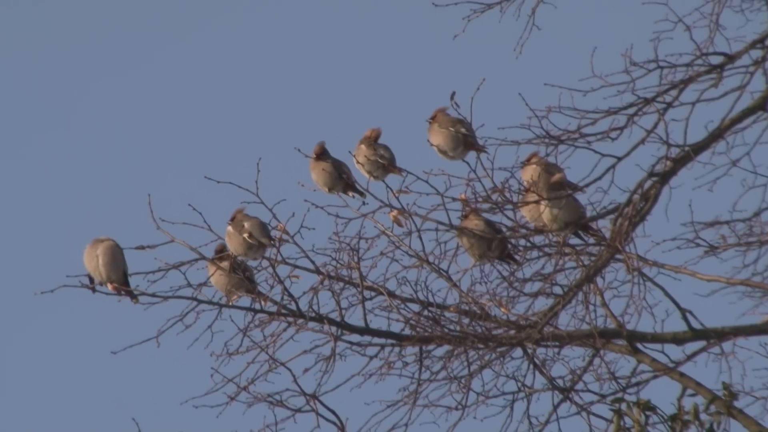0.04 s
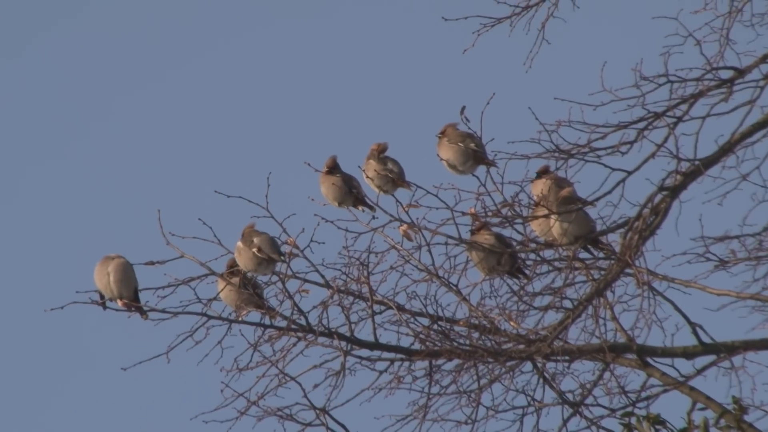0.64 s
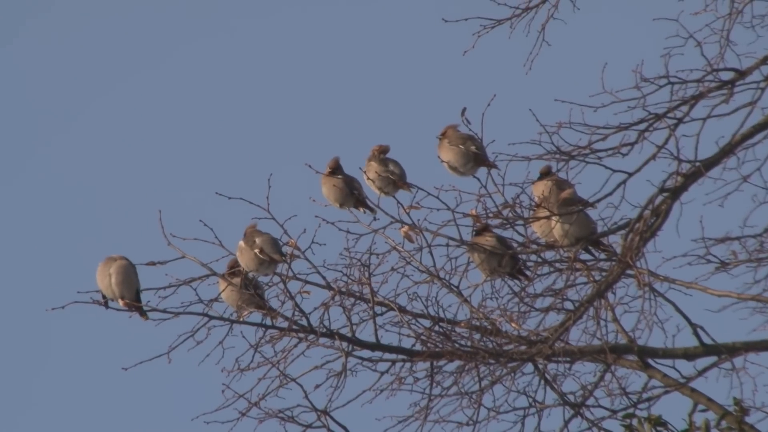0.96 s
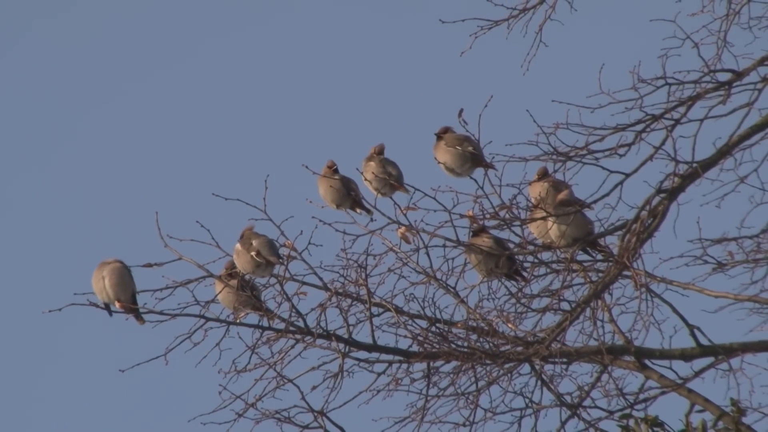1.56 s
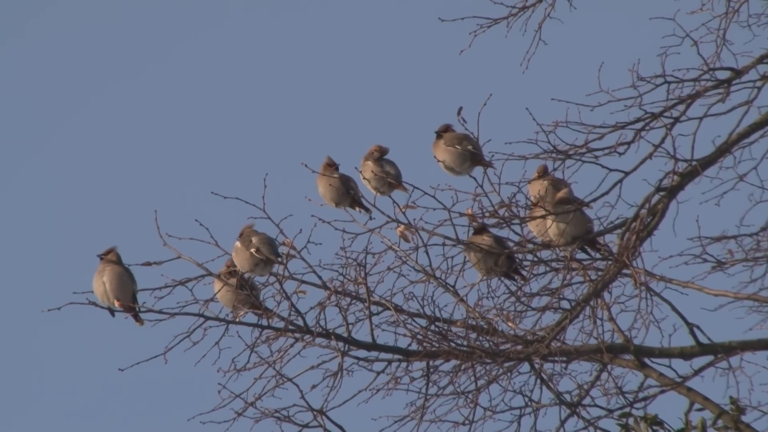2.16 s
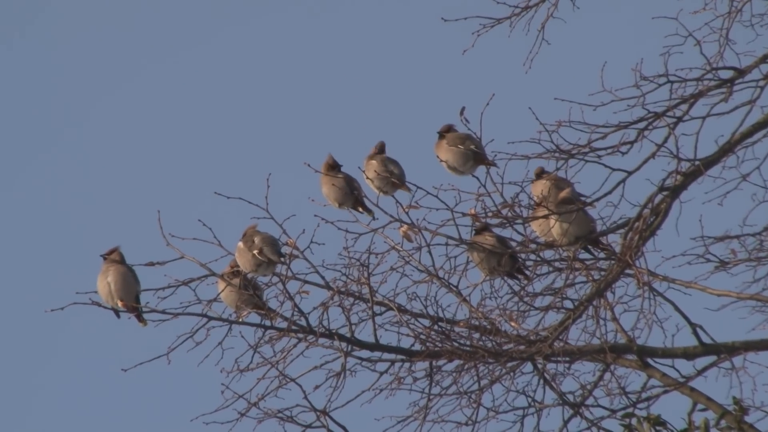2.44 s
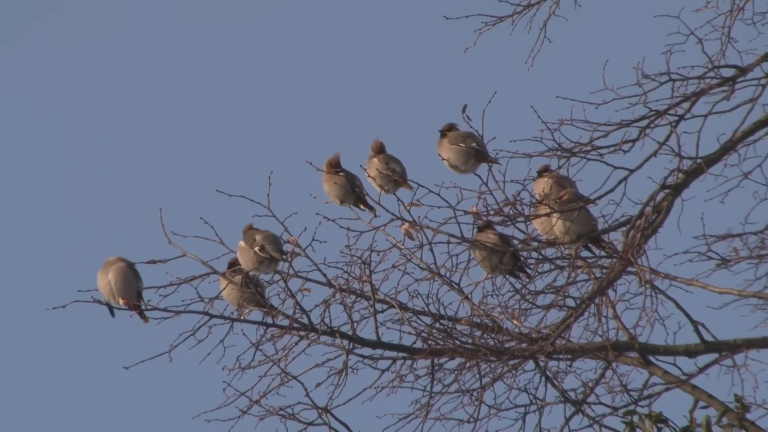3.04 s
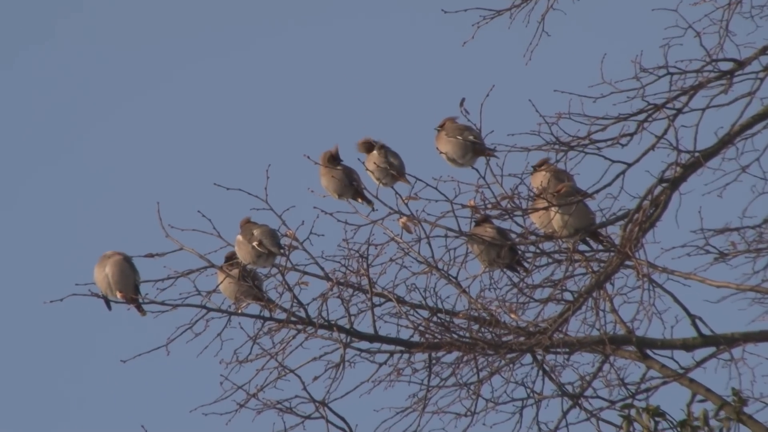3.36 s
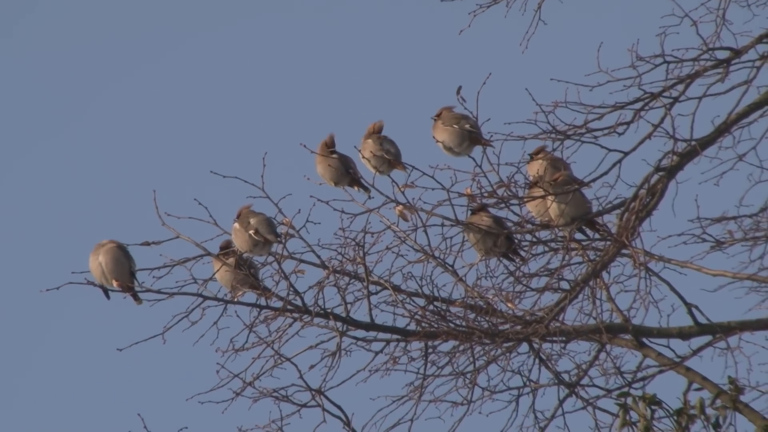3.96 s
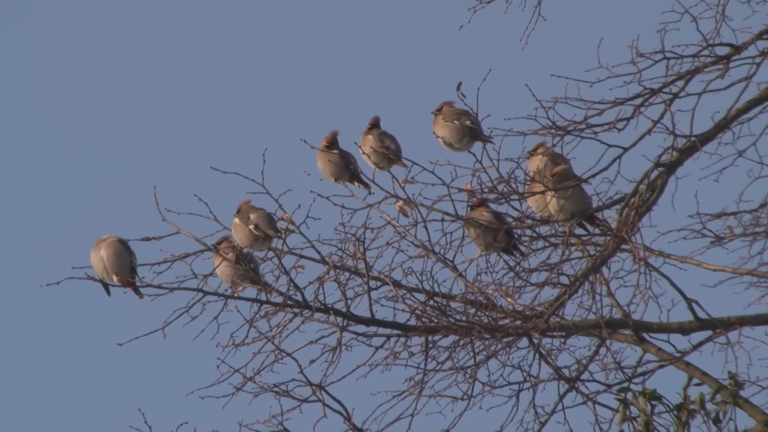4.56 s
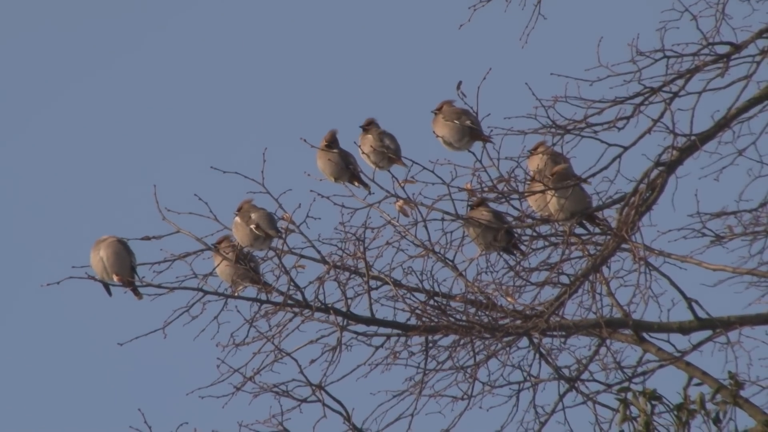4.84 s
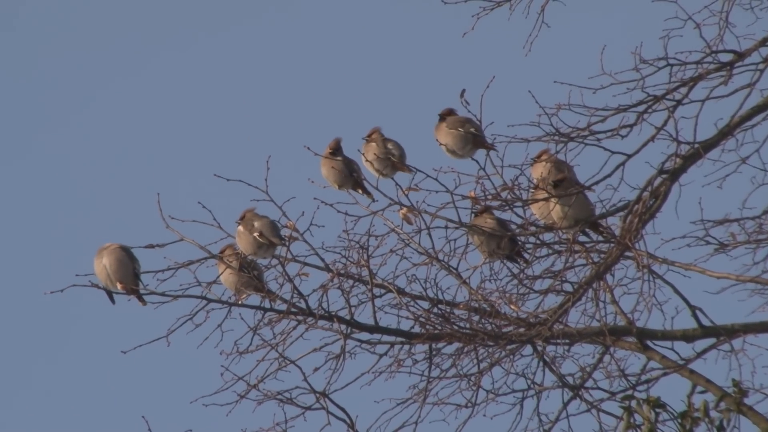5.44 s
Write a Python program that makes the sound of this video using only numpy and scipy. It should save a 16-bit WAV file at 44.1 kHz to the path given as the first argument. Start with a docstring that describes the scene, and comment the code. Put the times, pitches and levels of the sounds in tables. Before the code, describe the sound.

A light wind rumbles unevenly on the microphone outdoors, over a soft hiss and the hum of distant traffic. About a second in, small birds give two faint, thin, high trills, while others rasp and whistle farther off. Two more short trills follow past the middle. Near the end the wind buffets harder, the hand-held camera gives one small click, and a few faint chirps follow.

```python
"""A flock of waxwings gives thin, high trills from a bare tree: trains of frequency-modulated, almost pure
tones that interfere with their reflections from the branches. Other birds whistle and rasp farther off.
Turbulence in a light wind rumbles on the microphone over a steady hiss and the hum of distant traffic.
The hand-held camera whines faintly, rustles and creaks under the fingers, and one click rings its shell."""
import sys
import numpy as np
from scipy import signal
from scipy.fft import rfft, irfft, next_fast_len
from scipy.io import wavfile
from scipy.ndimage import uniform_filter1d

SR = 44100
rng = np.random.default_rng(int(sys.argv[2]) if len(sys.argv) > 2 else 0)


def to_wav(sig):
    """Store sig (one row per channel, or 1-D mono) as 16-bit WAV at the path in sys.argv[1].

    Samples outside -1..1 are clipped; the rate is SR.
    """
    pcm = np.clip(np.atleast_2d(sig), -1, 1) * 32767
    pcm = np.round(pcm).astype(np.int16)
    wavfile.write(sys.argv[1], SR, pcm.T)  # frames by channels


N = 242991
TIME = np.arange(N) / SR


def from_db(db):
    """Amplitude ratio of a level in decibels."""
    return 10 ** (np.asarray(db) / 20)


def rms_one(x):
    """Normalisation to unit rms."""
    return x / np.sqrt(np.mean(x ** 2) + 1e-20)


def noise(spectrum):
    """Spectral shaping: noise of unit rms, falling 20 dB per octave beyond the given points."""
    hz, db = np.transpose(spectrum)
    size = next_fast_len(N)
    octave = np.log2(np.maximum(np.arange(size // 2 + 1) * SR / size, 1))
    points = np.log2(hz)
    beyond = np.abs(octave - np.clip(octave, points[0], points[-1]))
    gain = from_db(np.interp(octave, points, db) - 20 * beyond)
    return rms_one(irfft(rfft(rng.standard_normal(size)) * gain, size)[:N])


def drift(hz):
    """Random modulation: low-pass noise of unit rms with its corner at hz."""
    r = np.exp(-2 * np.pi * hz / SR)
    return rms_one(signal.lfilter([1], [1, -2 * r, r * r], rng.standard_normal(N + SR))[SR:])


def resonate(x, hz, width_hz):
    """A damped resonance with unit peak gain."""
    r = np.exp(-np.pi * width_hz / SR)
    feedback = [1, -2 * r * np.cos(2 * np.pi * hz / SR), r * r]
    return signal.lfilter(np.array([1, 0, -1]) * (1 - r * r) / 2, feedback, x + 1e-18)


def span(start, length):
    """The samples of an event and its progress from 0 to 1."""
    at = np.flatnonzero((TIME >= start) & (TIME < start + length))
    return at, (TIME[at] - start) / length


def fade(progress, share):
    """Quarter-sine tapers, each a share of the event long."""
    return np.sin(np.pi / 2 * np.clip(np.minimum(progress, 1 - progress) / share, 0, 1))


def bell(peak, width):
    """Gaussian envelope, down to 1/e one width from its peak."""
    return np.exp(-((TIME - peak) / width) ** 2)


def phase_of(hz):
    """Phase as the time integral of frequency."""
    return 2 * np.pi * np.cumsum(hz) / SR


def scatter(x, t60, count=60):
    """Scattering by branches and walls: decaying echoes, together as strong as the sound itself."""
    delays = rng.uniform(0.006, t60, count)
    response = np.zeros(int(t60 * SR) + 1)
    response[(delays * SR).astype(int)] = from_db(-60 * delays / t60) * rng.choice([-1, 1], count)
    return signal.fftconvolve(x, response / np.linalg.norm(response))[:N]


# Noise floor spectrum: f/Hz, relative density/dB
HISS_SPECTRUM = [(1000, 0), (1800, -.6), (2500, -1.8), (3900, -2.4), (5500, -4), (7700, -5.4),
                 (10500, -5.6), (15500, -6.3)]

def hiss(level_db=-78.3):
    """Stationary broadband noise of the air and the microphone."""
    return from_db(level_db) * noise(HISS_SPECTRUM)


# Tyre noise spectrum: f/Hz, relative density/dB
TRAFFIC_SPECTRUM = [(120, -9.5), (220, 2.2), (300, -2), (410, 2), (560, -4.3), (700, -8.7), (950, -15),
                    (1200, -27.5), (1500, -34), (1700, -34.5), (2000, -42)]
# Passing vehicles: peak t/s, width/s, gain/dB
VEHICLES = [(2.1, 0.28, 1), (3.0, 0.29, 1.8), (4.55, .35, 1.5)]

def traffic(level_db=-58, swing_db=0.08):
    """Attenuation over distance dulls the tyre noise of far roads; it swells as vehicles pass."""
    swell_db = sum(db * bell(peak, width) for peak, width, db in VEHICLES)
    return from_db(level_db + swell_db + swing_db * drift(0.65)) * noise(TRAFFIC_SPECTRUM)


# Gusts, the narrow ones single buffets: peak t/s, width/s, level/dB
WIND_GUSTS = [(0.04, 0.029, -37), (0.501, 0.29, -34), (1.04, 0.33, -38.5), (2.313, 0.37, -39.5),
              (2.98, 0.27, -40), (4.25, 0.4, -35.5), (2.362, 0.0082, -29.5), (4.332, 0.01, -26.5),
              (4.503, 0.015, -29.5), (4.706, 0.0065, -22), (4.7, 0.29, -37), (4.943, 0.0049, -30.5),
              (4.993, 0.078, -32), (5.35, 0.8, -41)]
# Rumble spectrum: f/Hz, relative density/dB
RUMBLE_SPECTRUM = [(12, -50), (20, -16.5), (49, 0.5), (75, 0.5), (112, -7.5), (211, -24.5), (330, -32.5),
                   (430, -46.5), (730, -120)]

def wind(breeze_db=-45.5, turbulence_db=1.27, evenness=0.64, small_eddy_db=-22):
    """Turbulent pressure on the microphone port: large eddies rumble, smaller ones sound higher."""
    gust_power = sum(from_db(db) ** 2 * bell(peak, width) for peak, width, db in WIND_GUSTS)
    strength = np.sqrt(from_db(breeze_db) ** 2 + gust_power) * from_db(turbulence_db * drift(8.1))
    eddies = noise(RUMBLE_SPECTRUM)
    envelope = np.sqrt(uniform_filter1d(eddies ** 2, size=6000) + 1e-9)
    rumble = rms_one(eddies / envelope ** evenness)  # partly evens out the chance swells
    small_eddies = noise([(110, 6.5), (220, -15.5), (450, -18.5), (800, -26), (1200, -42)])
    return strength * (rumble + from_db(small_eddy_db) * small_eddies)


# Bursts of small eddies: peak t/s, width/s, level/dB
EDDY_BURSTS = [(.715, 0.088, -36.5), (1.86, 0.14, -48.5), (2.221, 0.039, -41.5), (4.881, 0.018, -36)]
# Their spectrum: f/Hz, relative density/dB
EDDY_SPECTRUM = [(115, 2), (150, -2), (210, -17.5), (300, -28.5)]

def flurries():
    """Intermittent turbulence: brief flurries of small eddies flutter above the rumble."""
    strength = sum(from_db(db) * bell(peak, width) for peak, width, db in EDDY_BURSTS)
    return strength * noise(EDDY_SPECTRUM)


def camera_whine(hz=14570, wander_hz=8, level_db=-94.5):
    """A pure tone from the electronics, with slight random frequency modulation."""
    return np.sqrt(2) * from_db(level_db) * np.sin(phase_of(hz + wander_hz * drift(3.0)))


# Fingers shifting on the camera: t/s, duration/s, level/dB
FINGER_SLIDES = [(1.354, 0.045, -72.5), (1.616, 0.021, -79), (3.295, 0.039, -80), (3.722, 0.03, -79.5),
                 (4.535, 0.061, -75), (4.937, 0.093, -77), (5.078, 0.015, -79), (5.194, 0.022, -79)]
# Friction spectrum: f/Hz, relative density/dB
FRICTION_SPECTRUM = [(3000, 0), (7000, 4.5), (11000, 6), (15500, 1)]

def finger_rustle(grain_db=2.5):
    """Sliding friction makes bright noise with a grainy envelope."""
    rubbing = np.zeros(N)
    for start, length, db in FINGER_SLIDES:
        at, progress = span(start, length)
        rubbing[at] += from_db(db) * fade(progress, 0.043)
    return rubbing * from_db(grain_db * drift(200)) * noise(FRICTION_SPECTRUM)


# Creaks of the grip: t/s, level/dB
CREAKS = [(2.659, -64), (4.053, -74), (4.867, -76), (4.941, -75)]

def grip_creaks(t60=.035):
    """Heavily damped transients: puffs of mid-range noise that decay exponentially."""
    strength = np.zeros(N)
    for start, db in CREAKS:
        at, _ = span(start, .1)
        strength[at] += from_db(db - 60 * (TIME[at] - start) / t60)
    return strength * noise([(1300, -3), (1750, 3), (3000, -2), (5000, 0), (7000, -4), (14000, -10)])


# A click and its rebounds: t/s, force level/dB
CONTACTS = [(4.892, -21), (4.8932, -45), (4.8946, -36)]
# Modes of the plastic shell: f/Hz, bandwidth/Hz, gain/dB
SHELL_MODES = [(880, 240, 5.5), (1800, 390, 2), (2420, 440, -1.5), (4550, 610, -6), (5700, 1100, -6.5),
               (8000, 1000, -1), (9900, 750, -2), (11300, 570, 5.5), (13800, 6900, -8)]

def camera_click(buzz_db=-26, buzz_t60=0.04, echo_db=-24):
    """Impact excitation: each contact, an impulse and a fainter buzz, rings the modes of the shell."""
    force = np.zeros(N)
    for start, db in CONTACTS:
        at, _ = span(start, .1)
        force[at[0]] += from_db(db)
        decay_db = 60 * (TIME[at] - start) / buzz_t60
        force[at] += from_db(db + buzz_db - decay_db) * rng.choice([-1, 1], len(at))
    click = sum((-1) ** k * from_db(db) * resonate(force, hz, width)
                for k, (hz, width, db) in enumerate(SHELL_MODES))
    return click + from_db(echo_db) * scatter(click, t60=0.18, count=400)


# Raspy chirps: t/s, duration/s, first f/Hz, last f/Hz, relative level/dB
RASPS = [(.706, .057, 5380, 5200, -78), (0.763, 0.06, 4530, 3890, -73), (.82, .052, 3770, 2850, -78.5)]

def raspy_chirps(gain_db=-2, flutter_db=3.0, echo_db=-5):
    """Fast random modulation of frequency and amplitude spreads a bird's tone into a band."""
    calls = np.zeros(N)
    wobble = 1 + .065 * drift(450)
    for start, length, first_hz, last_hz, db in RASPS:
        at, progress = span(start, length)
        hz = (first_hz + (last_hz - first_hz) * progress) * wobble[at]
        calls[at] += fade(progress, 0.35) * from_db(db + gain_db) * np.sin(phase_of(hz))
    calls *= from_db(flutter_db * drift(220))
    return calls + from_db(echo_db) * scatter(calls, t60=0.72)


# Falling whistles: t/s, duration/s, first f/Hz, last f/Hz, bend exponent (over 1 steepens), level/dB
FALLING_NOTES = [(1.155, .142, 4200, 1750, 3.3, -84), (1.592, .155, 5200, 1850, 1.7, -81),
                 (1.625, .08, 5700, 3700, 1.1, -83), (1.815, .036, 3400, 2130, .8, -86),
                 (2.27, .106, 5600, 2800, 1.6, -81.5), (2.374, .018, 2850, 1850, 1.1, -75),
                 (2.412, .027, 1800, 1320, .8, -78)]
# Arched notes: t/s, duration/s, top f/Hz, level/dB
ARCHED_NOTES = [(.965, .028, 5200, -83), (2.391, .026, 2150, -75.5), (2.497, .045, 2120, -84),
                (2.712, .03, 4800, -83), (3.298, .034, 3100, -79), (3.34, .048, 4030, -81),
                (3.42, .014, 3700, -80), (5.395, .041, 4070, -72.5), (5.46, .012, 5100, -79),
                (5.472, .01, 3950, -73.5), (5.478, .04, 5750, -84)]
# Their pitch contour: share of the duration, share of the top frequency
ARCH_CONTOUR = [(0, .86), (.2, .98), (.72, 1), (1, .79)]
# Notes of steady pitch: t/s, duration/s, f/Hz, level/dB
STEADY_NOTES = [(1.595, 0.04, 1850, -81), (1.675, 0.048, 1167, -76.5), (1.697, 0.085, 4650, -85),
                (1.772, 0.091, 1146, -79), (2.111, 0.11, 1234, -79), (5.435, 0.013, 3050, -81),
                (5.484, 0.015, 3050, -85)]

def far_birds(waver=.016, rasp=.03, flutter_db=3, echo_db=-8):
    """Frequency-modulated whistles that waver and flutter, blurred by reverberation."""
    wobble = 1 + waver * drift(60) + rasp * drift(400)
    calls = np.zeros(N)

    def whistle(start, length, db, pitch):
        """Adds a tapered tone whose frequency is a function of its progress."""
        at, progress = span(start, length)
        tone = np.sqrt(2) * np.sin(phase_of(pitch(progress) * wobble[at]))
        calls[at] += from_db(db) * fade(progress, 0.022) * tone

    for start, length, first_hz, last_hz, bend, db in FALLING_NOTES:
        whistle(start, length, db, lambda p: first_hz + (last_hz - first_hz) * p ** bend)
    for start, length, top_hz, db in ARCHED_NOTES:
        whistle(start, length, db, lambda p: top_hz * np.interp(p, *np.transpose(ARCH_CONTOUR)))
    for start, length, hz, db in STEADY_NOTES:
        whistle(start, length, db, lambda p: hz)
    calls *= from_db(flutter_db * drift(80))
    return calls + from_db(echo_db) * scatter(calls, t60=.32)


# Syllables of four trills, each trill opened by a short note:
# t/s, duration/s, top f/Hz, slide end f/Hz, flick end f/Hz, level/dB, first reflection gain/dB
TRILL_SYLLABLES = [(1.03, .019, 6550, 6200, 4500, -71.5, -24), (1.056, .036, 6870, 6300, 5500, -74, -24),
                   (1.103, .035, 7600, 6450, 5200, -75, -24), (1.144, .046, 6780, 6200, 4660, -71.5, -26),
                   (1.196, .053, 7050, 6100, 4900, -70, -27), (1.372, .013, 6700, 6450, 5800, -72, -22),
                   (1.396, .039, 6100, 5600, 4180, -69.5, -22), (1.44, .046, 7400, 6150, 4600, -71, -20),
                   (1.493, .041, 6520, 5950, 4700, -68.5, -22), (1.541, .046, 7250, 6100, 4400, -70.5, -18),
                   (1.597, .037, 6250, 5750, 5300, -69.5, -22), (3.445, .024, 6450, 6050, 5830, -70, -11),
                   (3.488, .028, 6750, 6300, 5700, -68, -9), (3.529, .04, 7100, 6200, 5000, -69, -11),
                   (3.584, .038, 7000, 6000, 4800, -69, -10), (3.833, .013, 6300, 6100, 5000, -71.5, -6),
                   (3.854, .034, 6850, 6550, 5300, -70.5, -5), (3.9, .037, 7300, 6450, 5100, -70.5, -5),
                   (3.951, .03, 7300, 6600, 5900, -71.5, -5)]
# Envelope of a syllable: share of the duration, gain/dB
SYLLABLE_ENVELOPE = [(0, -9), (.2, -.5), (.55, .5), (.8, -1.5), (1, -9)]
# Reflections from near branches: delay/s, level re the first/dB
BRANCH_REFLECTIONS = [(.0045, 0), (.0115, -4)]

def waxwings(rise_s=.0045, flick_s=.007, hoarseness=.007, flutter_db=3.0, octave_db=-21, echo_db=-16):
    """Interference: a near-sine rises, slides down and drops away, beating with its delayed reflections."""
    trills = np.zeros(N)
    waver = 1 + hoarseness * drift(270)
    flutter = from_db(flutter_db * drift(77))
    for start, length, top_hz, end_hz, flick_hz, db, reflection_db in TRILL_SYLLABLES:
        at, progress = span(start, length)
        corners = [0, min(rise_s / length, .3), max(1 - flick_s / length, .6), 1]
        hz = np.interp(progress, corners, [.9 * top_hz, top_hz, end_hz, flick_hz])
        phase = phase_of(hz * waver[at])
        shape_db = np.interp(progress, *np.transpose(SYLLABLE_ENVELOPE))
        envelope = fade(progress, 0.012) * from_db(db + shape_db) * flutter[at]
        tone = np.sqrt(2) * envelope * (np.sin(phase) + from_db(octave_db) * np.sin(2 * phase))
        trills[at] += tone
        for delay, relative_db in BRANCH_REFLECTIONS:
            trills[at + int(delay * SR)] += from_db(reflection_db + relative_db) * tone
    return trills + from_db(echo_db) * scatter(trills, t60=0.66)


def scene():
    """Superposition of all sources at one microphone."""
    background = wind() + flurries() + traffic() + hiss()
    camera = camera_whine() + finger_rustle() + grip_creaks() + camera_click()
    birds = raspy_chirps() + far_birds() + waxwings()
    return (background + camera + birds)[None]


def record(dry, cutoff_hz=15900):
    """Band limiting: an elliptic low-pass filter cuts the top steeply."""
    return signal.sosfilt(signal.ellip(10, .1, 70, cutoff_hz, fs=SR, output="sos"), dry)


dry = scene()
out = record(dry)
to_wav(out)
```